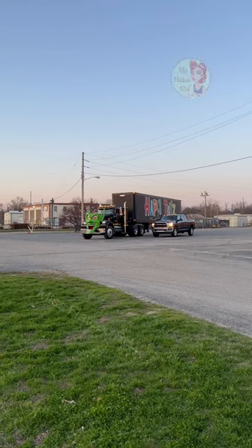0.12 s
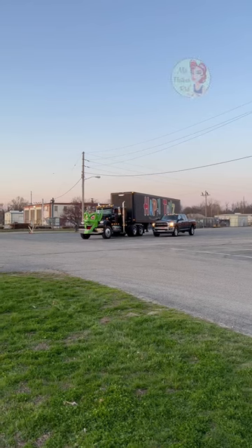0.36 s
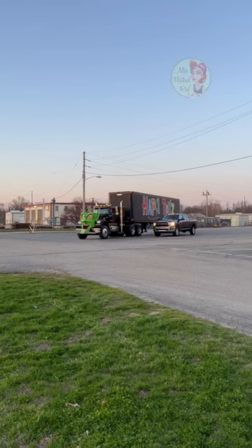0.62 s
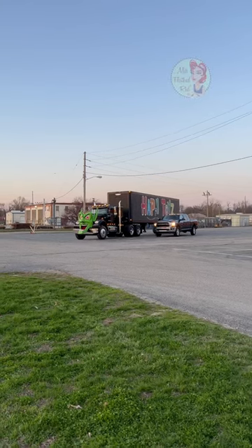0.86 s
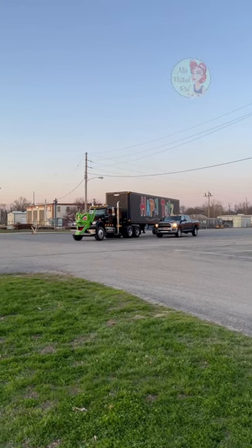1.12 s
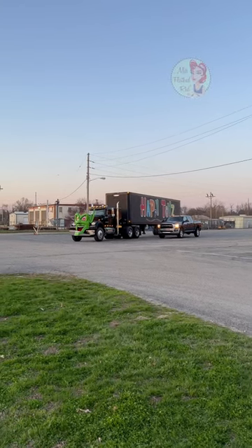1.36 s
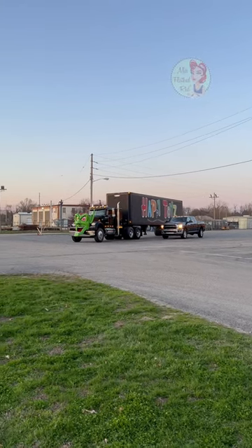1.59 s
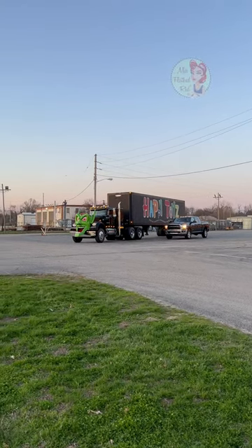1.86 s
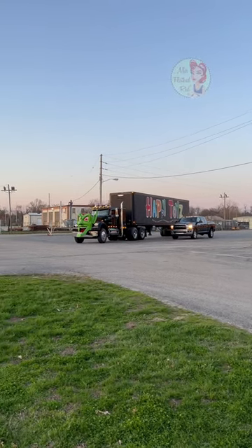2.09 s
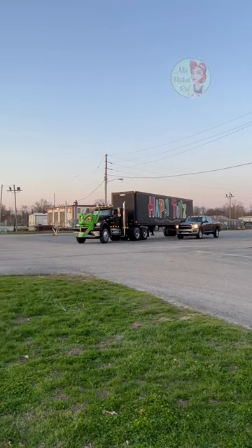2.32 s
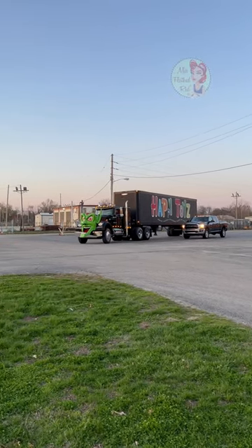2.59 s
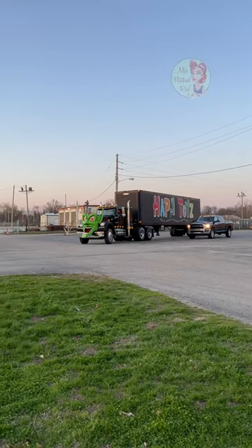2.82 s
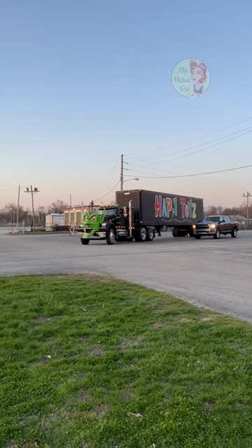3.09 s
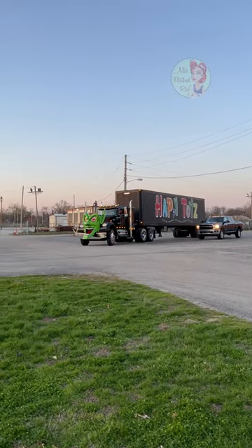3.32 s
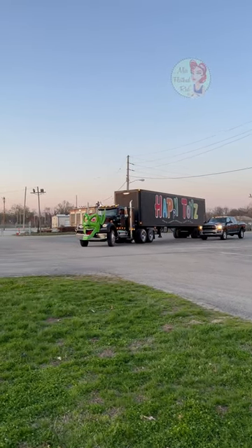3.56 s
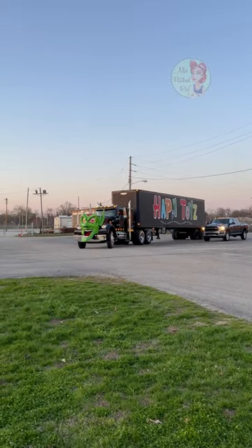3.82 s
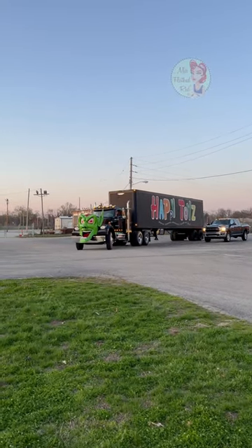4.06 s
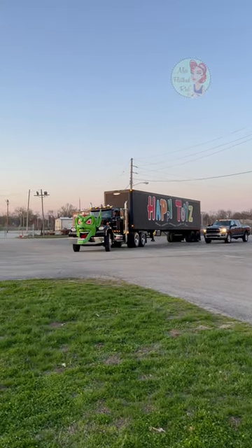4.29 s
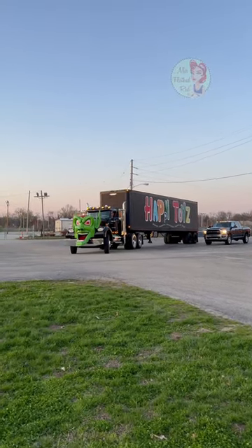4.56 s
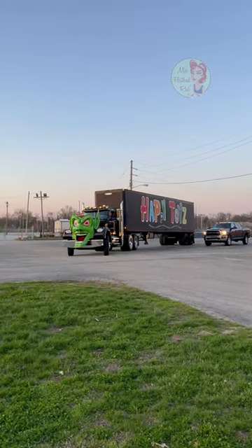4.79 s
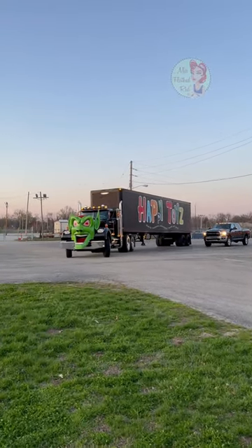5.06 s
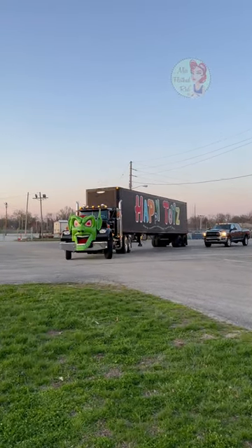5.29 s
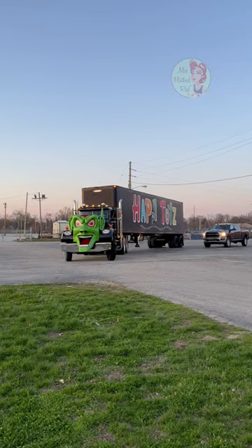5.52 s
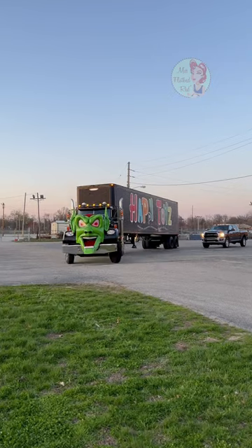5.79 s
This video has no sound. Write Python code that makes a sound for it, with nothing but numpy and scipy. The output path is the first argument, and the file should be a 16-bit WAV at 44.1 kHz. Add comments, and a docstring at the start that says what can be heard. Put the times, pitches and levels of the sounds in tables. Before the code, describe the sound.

After a tiny silence, a diesel lorry's deep rumble and throbbing exhaust come in, with a small patter of grit and one distant bird chirp. The engine revs up in surges, with more tyre roar and hiss as it nears, and ends high, loud and rasping. Handheld phone, open air, dry and wide, with no close echoes.

```python
"""A deep rumble and a low engine drone come in first, after a blink of silence, then grit sprays and far birds chirp.
A two-stroke diesel V8 lorry with twin exhaust stacks pulls a trailer round a paved lot towards a phone, revving up.
The stacks drone as clean tones on multiples of the shaft speed, and the high multiples rasp.
Block and tyres roar as coloured noise, partly pulsing with the firings; grit ticks are tiny noise bursts.
A thin hiss hangs high, made of a narrow band of noise, and the birds are short whistles."""
import sys
import numpy as np
from scipy import signal
from scipy.fft import rfft, irfft
from scipy.io import wavfile
from scipy.ndimage import uniform_filter1d

SR = 44100
rng = np.random.default_rng(int(sys.argv[2]) if len(sys.argv) > 2 else 0)


def wav_record(signal):
    """Record a signal, one row per channel, as 16-bit PCM in the file named by sys.argv[1]."""
    frames = np.transpose(np.atleast_2d(signal))
    bounded = np.clip(frames, -1, 1)
    # unit amplitude maps onto the largest positive 16-bit level
    quanta = np.round(bounded * 32767).astype(np.int16)
    wavfile.write(sys.argv[1], SR, quanta)


def volts_from_db(level):
    """Convert decibel levels to linear amplitude ratios."""
    exponent = np.asarray(level, float) / 20
    return 10 ** exponent


N = 260190
TIME = np.arange(N) / SR  # seconds
HZ = np.fft.rfftfreq(N, 1 / SR)


def rms1(x):
    """Scale to an rms of 1, over both channels together if there are two."""
    return x / np.sqrt(np.mean(x ** 2))


def on_log(hz, table, column=1):
    """Read one column of a table along a log-frequency axis, holding the end values."""
    table = np.array(table, float)
    return np.interp(np.log(hz + 1), np.log(table[:, 0]), table[:, column])


def curves(table):
    """Join each column of a table by straight lines in time; the first column is seconds."""
    seconds, *columns = np.transpose(table)
    return [np.interp(TIME, seconds, column) for column in columns]


def walk(rate_hz):
    """Wandering random level: values held 1 / rate_hz seconds, smoothed twice, spread near 1.9."""
    hold = int(SR / rate_hz)
    steps = np.repeat(rng.standard_normal(N // hold + 1), hold)
    return 2.54 * uniform_filter1d(uniform_filter1d(steps, hold), hold)[:N]


# How the two microphone ports of the phone differ.
# Each row: frequency in Hz, left minus right in dB, lead of the right in radians, likeness from 0 to 1.
PORTS = [(30, 1.2, 0, .4), (90, 1.8, .2, .6), (260, 3.7, .4, .8), (600, 2.5, 1.1, .9), (780, -2, 1.3, .9),
         (1000, -5.6, .5, .87), (1300, -1.8, -.1, .92), (1460, -2.9, -.2, .92), (1800, .8, -.7, .88),
         (2050, -4, -1.5, .7), (2500, 0, -3.5, .85), (2700, 2.6, -3.2, .65), (3100, 2.2, -2.6, .9),
         (3230, 1.5, -4.5, .5), (3360, 2, -6.3, .85), (3700, .2, -9.1, .8), (3900, 3.3, -11.4, .8),
         (4220, -2.5, -15.2, .7), (4400, 0, -15.9, .92), (4650, -2.5, -15.4, .6), (4850, -6, -14.8, .7),
         (5300, 0, -15.7, 1)]
# From its first frequency up, this lead is used instead of the ports' lead: in the treble, each band is either
# alike or opposite in the two channels. Each row: frequency in Hz, lead of the right in half cycles.
TREBLE_FLIPS = [(5300, -5), (6250, -5), (6450, -6), (8600, -6), (9750, -7), (10950, -7), (11300, -8),
                (13750, -8), (13950, -9)]


def ports(x):
    """Carry one sound to the two ports, each with its own colour and lag; in the treble the two channels are
    band by band alike or opposite."""
    treble_lead = np.pi * on_log(HZ, TREBLE_FLIPS)
    lead = np.where(HZ < TREBLE_FLIPS[0][0], on_log(HZ, PORTS, column=2), treble_lead)
    # each port takes half of the difference
    half = volts_from_db(on_log(HZ, PORTS) / 2) * np.exp(-.5j * lead)
    return irfft(rfft(x) * np.array([half, 1 / half]), N)


def roar(colour, source):
    """Coloured noise at rms 1: part reaches both ports alike, the scattered rest differs."""
    likeness = np.clip(on_log(HZ, PORTS, column=3), 0, 1)
    left = ports(rng.standard_normal(N) * source)[0]
    right = ports(rng.standard_normal(N) * source)[1]
    scattered = rfft(np.array([left, right]))
    alike = rfft(ports(rng.standard_normal(N) * source))
    mixed = np.sqrt(likeness) * alike + np.sqrt(1 - likeness) * scattered
    return rms1(irfft(mixed * volts_from_db(on_log(HZ, colour)), N))


# Far birds. Each row: middle in seconds, pitch in Hz, peak level in dB, half length in seconds.
CHIRPS = [(.684, 2700, -46, .011), (2.505, 2700, -48, .012), (2.612, 4700, -50, .005)]


def birds():
    """Short whistles: steady sine tones under flat-topped swells."""
    song = np.zeros(N)
    for middle_s, hz, db, half_s in CHIRPS:
        shape = np.exp(-((TIME - middle_s) / half_s) ** 4)
        song += volts_from_db(db) * shape * np.sin(2 * np.pi * hz * TIME)
    return song


# Each row: time in seconds, level of the thin hiss in dB (it flickers around this),
# level of the topmost treble in dB.
TREBLE = [(.03, -57, -108), (.78, -56, -106), (.9, -69, -102), (1.4, -68, -100), (2.2, -60, -87),
          (3.0, -59, -75), (3.6, -59, -68), (4.05, -57, -68), (4.2, -57, -63), (4.7, -60, -65.5),
          (5.5, -61, -58), (5.9, -58, -60.5)]


def thin_hiss():
    """A narrow band of noise, unrelated left and right, with a flickering level."""
    centre_hz, half_width_hz = 4550, 125
    shape = np.exp(-((HZ - centre_hz) / half_width_hz) ** 2)
    noise = rms1(irfft(rfft(rng.standard_normal((2, N))) * shape, N))
    flicker_db = 1.5 * walk(6)
    return volts_from_db(curves(TREBLE)[0] + flicker_db) * noise


# Colour of the topmost treble. Each row: frequency in Hz, relative level in dB.
SIZZLE_COLOUR = [(9000, -23), (11000, -5.5), (14000, -3.5), (15700, -1.5), (16000, -50)]


def sizzle():
    """The topmost treble: steady noise whose level follows its column of the treble table."""
    return volts_from_db(curves(TREBLE)[1]) * roar(SIZZLE_COLOUR, 1)


# The lorry draws nearer. Each row: time in seconds, clatter and hiss levels in dB before each layer's own offset.
NEARING = [(.03, -43, -68), (.35, -42, -72), (1.25, -45.5, -71.5), (1.9, -39.5, -65.5), (2.4, -36.5, -64.5),
           (3.0, -37, -60.5), (3.6, -37, -57), (4.3, -35, -56), (4.75, -37.5, -56.5), (5.1, -35.5, -52),
           (5.45, -33.5, -48.5), (5.75, -35.5, -50), (5.9, -35, -49.5)]
# The louder ticks of grit. Each row: time in seconds, strength in dB before gain and filters.
TICKS = [(0.0827, -56), (0.1346, -51), (0.14, -57), (.152, -59), (.169, -58), (.2354, -60), (4.139, -45),
         (4.151, -48), (4.1772, -48), (4.1962, -40), (4.1995, -46), (4.2104, -46), (4.2352, -42)]
# Loose grit sprays up. Each row: start in seconds, end in seconds, grains a second, dB over the patter.
SPRAYS = [(.07, 0.298, 900, 3), (4.124, 4.3, 1100, 4.5)]


def grit():
    """Stones tick under the tyres: a few loud ones, a random patter and short sprays, all tiny noise bursts."""
    seconds, db = np.transpose(TICKS)
    clicks = np.zeros(N)
    clicks[(seconds * SR).astype(int)] = 6 * volts_from_db(db)
    clicks = signal.lfilter(*signal.butter(1, 11000, fs=SR), clicks)
    grains_per_s, lift_db = np.full(N, 300.), np.zeros(N)
    for start, end, spray_rate, spray_db in SPRAYS:
        inside = (TIME > start) & (TIME < end)
        grains_per_s = np.where(inside, spray_rate, grains_per_s)
        lift_db = np.where(inside, spray_db, lift_db)
    # the patter follows the hiss level as the lorry nears
    grain_db = curves(NEARING)[1] + lift_db - 0.5 + 1.9 * rng.exponential(size=N)
    patter = (rng.random(N) < grains_per_s / SR) * volts_from_db(grain_db)
    patter = signal.lfilter(*signal.butter(2, 9000, fs=SR), patter)  # the small grains are duller
    decay_s = 0.0009
    tick = rng.standard_normal(512) * np.exp(-np.arange(512) / (decay_s * SR))
    tick = np.convolve(tick, [1, 1])  # softens the very top
    ticking = np.convolve(clicks + patter, tick)[:N]
    return signal.lfilter(*signal.butter(2, 3000, "high", fs=SR), ticking)


# Colour of the rumble. Each row: frequency in Hz, relative level in dB.
RUMBLE_COLOUR = [(20, -33.5), (35, -13.5), (60, 0), (100, -1.5), (160, -4), (260, -6), (400, -15),
                 (600, -20), (900, -65.5)]
# Each row: time in seconds, level of the rumble in dB (it wanders around this).
RUMBLE_LEVEL = [(.03, -33.5), (.6, -32), (1.25, -35), (1.6, -29), (2.2, -26.5), (2.8, -28), (3.4, -29),
                (4.0, -28), (4.6, -27), (5.2, -29.5), (5.9, -29.5)]


def rumble():
    """The low part of the roar: deep noise with a slowly wandering level."""
    return volts_from_db(curves(RUMBLE_LEVEL)[0] + 1.3 * walk(4.39)) * roar(RUMBLE_COLOUR, 1)


# Colour of the hiss. Each row: frequency in Hz, relative level in dB.
HISS_COLOUR = [(3000, -17), (5000, 6), (7500, 0), (9500, -3), (11000, -19.5)]


def hiss(burst):
    """The high part of the roar: noise that swells with each firing and grows as the lorry nears."""
    level_db = curves(NEARING)[1] + 5 + 0.86 * walk(9)
    return volts_from_db(level_db) * roar(HISS_COLOUR, 1 + 0.25 * burst)


# Colour of the clatter. Each row: frequency in Hz, relative level in dB.
CLATTER_COLOUR = [(250, -23.5), (450, -6.5), (600, -3.5), (800, -3.5), (1100, -5.5), (1700, -11.5),
                  (2200, -17.5), (2900, -20.5), (3170, -25), (3470, -21), (3770, -25.5), (4070, -20),
                  (4370, -27), (4750, -23), (5250, -24), (6500, -65.5)]


def clatter(burst):
    """The middle part of the roar: noise that swells with each firing."""
    level_db = curves(NEARING)[0] + 6.5 + 0.5 * walk(9)
    return volts_from_db(level_db) * roar(CLATTER_COLOUR, 1 + 0.24 * burst)


# Engine speed. Each row: time in seconds, shaft turns a second.
SHAFT = [(0.03, 9.43), (0.23, 9.8), (0.44, 10.46), (0.68, 10.48), (0.95, 11.18), (1.15, 11.04),
         (1.29, 11.45), (1.42, 11.1), (1.63, 12.41), (1.77, 12.63), (1.97, 12.21), (2.13, 12.47),
         (2.38, 14.4), (2.47, 14.7), (2.75, 14.67), (3.15, 17.02), (3.45, 16.94), (4.0, 18.8), (4.27, 18.9),
         (4.6, 20.28), (5.03, 21.36), (5.5, 23.7), (5.65, 23.86), (5.9, 23.6)]


def shaft():
    """The shaft speed in Hz and the turns made so far, which add up from the speed."""
    shaft_hz = curves(SHAFT)[0]
    return shaft_hz, .21 + np.cumsum(shaft_hz) / SR


# The eight firings of one turn. Each row: when it fires as a share of the turn, strength in dB.
FIRINGS = [(.1, 0), (.235, -12), (.36, -3), (.49, -14), (.6, 0), (.74, -12), (.87, -6), (.98, -14)]


def firing_bursts(turns):
    """A kick per cylinder and turn, uneven in size and timing; each gas burst dies away smoothly."""
    scatter_db, jitter_s, decay_s = 4.5, .0003, .011
    share, db = np.transpose(FIRINGS)
    whole_turns = int(turns[-1])
    at_turn = (np.arange(whole_turns)[:, None] + share).ravel()
    time_chance, size_chance = rng.standard_normal((len(at_turn), 2)).T
    sample = (np.interp(at_turn, turns, TIME) + jitter_s * time_chance) * SR
    size = volts_from_db(np.tile(db, whole_turns) + scatter_db * size_chance)
    pulses = np.bincount(np.clip(sample.astype(int), 0, N - 1), size, N)
    return rms1(signal.lfilter([1], [1, -np.exp(-1 / (decay_s * SR))], pulses))


# Single shaft multiples swell or sink for a while as the firing balance shifts.
# The first list names the multiple of each row of the second.
SWELL_ORDERS = (3, 5, 5, 6, 13, 13, 13, 14, 15, 16, 16, 17, 17, 18, 20, 20, 21, 21, 22, 22, 23, 24, 25, 26,
                27, 27, 31, 31, 32, 35, 39, 43, 47, 34, 25, 27, 24, 27, 27, 15, 12, 38, 16, 8, 61, 28, 12,
                29, 19, 40, 7, 19, 46)
# Each row: start in seconds, end in seconds, change in dB.
# Where the start is the later time, the change has the opposite sign between the two times.
SWELLS = [(-0.5, 2.9, -7.5), (0, 1.4, -10.5), (3, 3.7, -10.5), (3, 3.7, 9), (0, 1.9, 13), (3, 4.1, 11.5),
          (3.5, 6, -4), (3, 6, -7.5), (5.5, 6, 3), (2.5, 2.85, -6.5), (3.5, 4.2, -9), (2.5, 3.05, 12.5),
          (4.5, 5.1, -8.5), (4.5, 4.8, -13), (-1, 0.69, 5.5), (2.4, 2.8, -4), (0, 1.3, -3.5),
          (3.5, 5.15, -15), (1.95, 2.7, -10), (4.5, 5.1, -7), (5.5, 6, 9), (6, 5.2, 5), (1.5, 2.9, -9),
          (5.5, 6, 4), (1, 1.95, 7), (5.5, 6, -12), (4.5, 4.95, 8), (2, 2.1, -11), (3.5, 5.1, 8.5),
          (4.5, 5.1, 4), (5, 5.2, 7), (6, 5.2, 5.5), (4.5, 4.8, 7), (6, 5.8, 7.5), (6, 5.8, 2.5),
          (4.5, 5.0, 3.5), (2.5, 2.85, 2), (0.15, 0.43, 6.5), (4.5, 3.45, 4), (2.9, 4.2, 4),
          (1.14, 1.35, -4), (5.5, 5.75, 7.5), (3.0, 3.65, 3.5), (7, 5.1, 5), (3, 3.6, 3), (1.5, 2.5, 4),
          (5, 6, 5.5), (4.5, 5.35, 5.5), (5, 5.4, 7.5), (4, 4.7, -8), (3.5, 4.0, 7), (1.5, 2.9, 9),
          (6.5, 5.9, 8)]


def swell_db(order):
    """Rise, hold and fall of all the swells of one shaft multiple, with soft edges."""
    def edge(s):
        return .5 + .5 * np.tanh((TIME - s) / .04)

    total_db = 0
    for swelling, (start, end, db) in zip(SWELL_ORDERS, SWELLS):
        if swelling == order:
            total_db = total_db + db * (edge(start) - edge(end))
    return total_db


# The shaft multiples that belong to a cylinder bank.
BANK_ORDERS = (4, 8, 12, 16)
# Levels in dB of the shaft multiples from the 3rd up, from uneven firing; those beyond share the last one.
ORDER_DB = [-1, 7, 7.5, 0, 4.5, -5.5, 3.5, -0.5, 5, 8.5, -11, -2, -2, 9.5, -6.5, -5, -9.5, -5, 6, 3.5, -4.5,
            -1, 2.5, 1, 3, -5.5]
# Standing waves in the stacks. Each row: frequency in Hz, level in dB.
STACKS = [(30, -8), (60, -5), (90, -2), (112, -1), (130, -14.5), (150, 9.5), (170, -1.5), (188, 1.5),
          (205, 11.5), (228, 2), (257, 6.5), (280, 3.5), (305, -5), (330, -4.5), (352, 8), (375, -3),
          (420, -9.5), (456, 8.5), (480, -6), (550, -2), (600, -2), (650, 2), (720, 3.5), (820, -3),
          (930, 0), (1000, -5), (1040, 0), (1090, -10), (1300, -10)]
# Standing waves met by the cylinder-bank multiples. Each row: frequency in Hz, level in dB.
BANK_STACKS = [(36.0, -11), (60.0, -11.5), (80.0, 4.5), (95.0, 18), (115.0, -1), (135.0, 13), (150.0, 17.5),
               (165.0, 6.5), (178.0, 11), (190.0, -1), (210.0, 4), (225.0, -2), (240.0, -2), (257.0, 2),
               (280.0, 1), (300.0, -22), (335.0, -7.5), (385.0, -20)]
# How hard the exhaust blows. Each row: time in seconds, base level of the low multiples (load) in dB,
# base level of the high ones (rasp) in dB, cylinder-bank multiples over the load in dB.
EXHAUST = [(.03, -46, -48.5, 2.5), (.3, -40, -50, -5), (.9, -43, -50.5, -3), (1.3, -41.5, -50.5, -11),
           (1.43, -41, -49, -3), (1.55, -44, -45, 0), (2.15, -42.5, -45, 2.5), (2.3, -37, -41, 0),
           (2.85, -41, -42.5, 4.5), (2.97, -38.5, -45, -2), (3.5, -41, -49, 0.2), (3.8, -41, -45, 8),
           (4.4, -38, -46, 3), (4.55, -35.5, -43, -0.5), (4.8, -36, -36.5, -0.5), (5.1, -36, -35, 0.8),
           (5.25, -35.5, -38.5, -1), (5.4, -36.5, -33.5, -1.2), (5.7, -36, -30.5, -1.5),
           (5.9, -34, -39.5, -1)]
# The rasp moves as the stacks turn. Each row: time in seconds, rasp centre in Hz,
# how far every fourth rasp multiple stands above the others in dB, lift of all odd multiples in dB.
RASP_CENTRE = [(0, 336, -0.5, 1), (2.2, 344, -0.5, 0), (3.1, 400, 0.5, 1.5), (3.7, 477, -1, 0),
               (4.2, 750, -1, 0), (4.5, 620, 4, 0.5), (5.1, 860, 5, 0), (5.3, 544, 1.5, 4),
               (5.6, 538, -1.5, 4.5), (5.9, 514, 0, 2)]


def drone(shaft_hz, turns):
    """Tones on the shaft multiples, phased by the firing pattern, swelling as they cross a standing wave."""
    first_order, last_order, rasp_from = 3, 64, 20
    load_db, rasp_db, bank_db = curves(EXHAUST)
    centre_hz, contrast_db, odd_db = curves(RASP_CENTRE)
    share, firing_db = np.transpose(FIRINGS)
    out = 0
    for k in range(first_order, last_order + 1):
        hz = k * shaft_hz
        if k < rasp_from:
            level_db = load_db
        else:
            side = 1 if k % 4 == 3 else -1  # every fourth multiple against the others
            level_db = rasp_db + side * contrast_db / 2 - 7 * np.log2(hz / centre_hz) ** 2
        level_db = level_db + ORDER_DB[min(k - first_order, len(ORDER_DB) - 1)]
        if k in BANK_ORDERS:
            level_db = level_db + bank_db + on_log(hz, BANK_STACKS)
            wander_db = .6
        else:
            level_db = level_db + on_log(hz, STACKS)
            wander_db = .9
        level_db = level_db + swell_db(k) + wander_db * walk(9)
        if k % 2:
            level_db = level_db + odd_db
        phase = np.angle(np.sum(volts_from_db(firing_db) * np.exp(-2j * np.pi * k * share)))
        # below the 16th, the starting phase shifts more and more
        phase += np.pi / 24 * max(16 - k, 0) ** 2
        waver = .0015 * k * walk(10)  # radians: no two turns are quite alike
        out = out + np.sqrt(2) * volts_from_db(level_db) * np.cos(2 * np.pi * k * turns + phase + waver)
    return out


def scene():
    """The revving lorry with its grit and roar, under the thin hiss and the far birds."""
    shaft_hz, turns = shaft()
    burst = firing_bursts(turns)
    background = birds() + thin_hiss() + sizzle()
    roaring = rumble() + hiss(burst) + clatter(burst)
    return background + roaring + ports(grit() + drone(shaft_hz, turns))


def low_pass(x):
    """Removes everything above the highest recorded frequency."""
    return signal.sosfilt(signal.butter(12, 15800, fs=SR, output="sos"), x)


def record(dry):
    """The sound fades in quickly after a short silence; the loudest peaks are rounded."""
    start_s, fade_s, ceiling = .0245, .0025, .95
    gate = np.clip((TIME - start_s) / fade_s, 0, 1)
    rounded = dry * gate / (1 + np.abs(dry / ceiling) ** 4) ** .25
    return low_pass(rounded)


dry = scene()
out = record(dry)
wav_record(out)
```